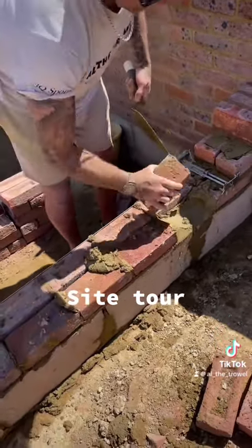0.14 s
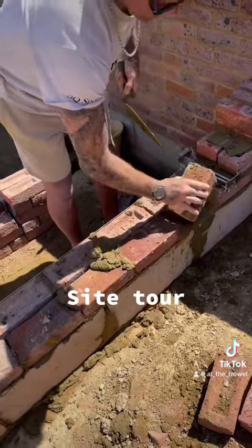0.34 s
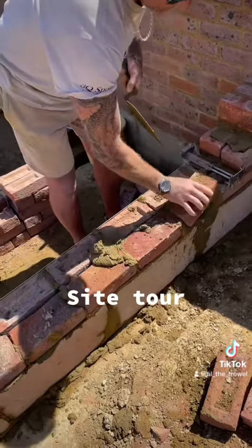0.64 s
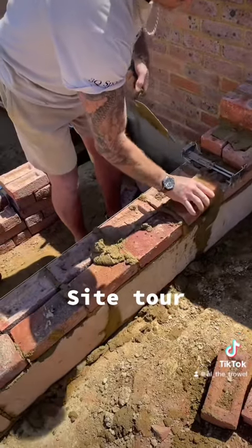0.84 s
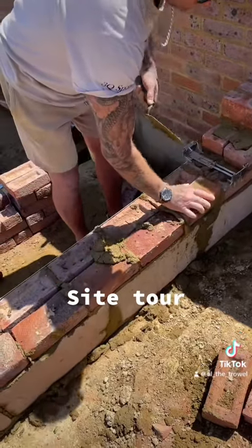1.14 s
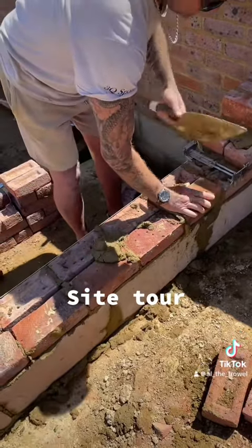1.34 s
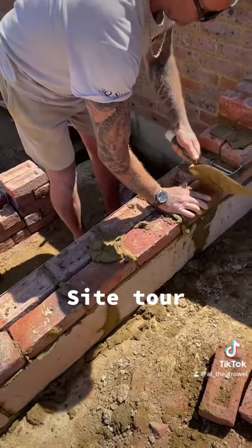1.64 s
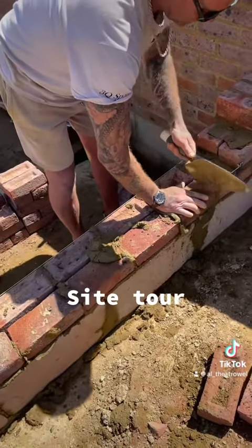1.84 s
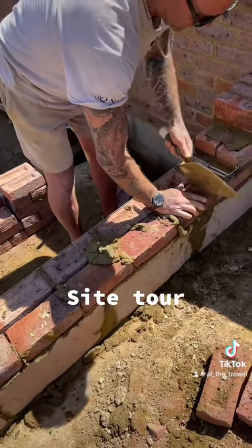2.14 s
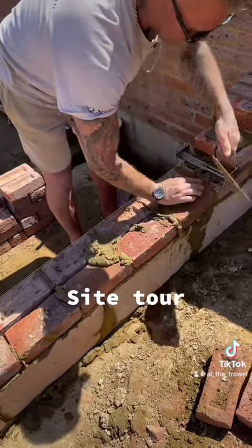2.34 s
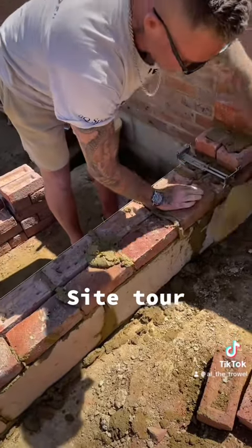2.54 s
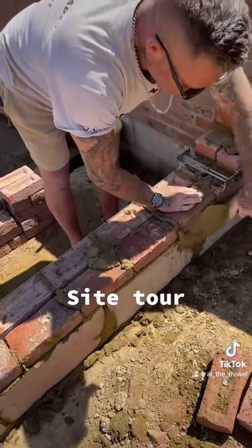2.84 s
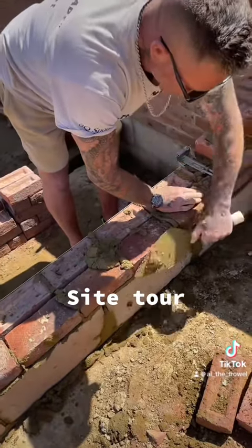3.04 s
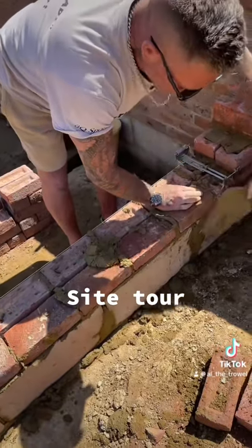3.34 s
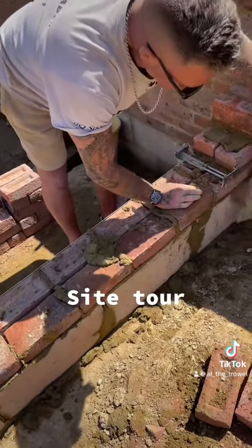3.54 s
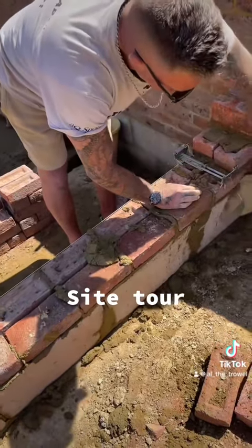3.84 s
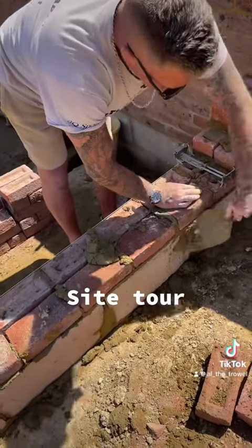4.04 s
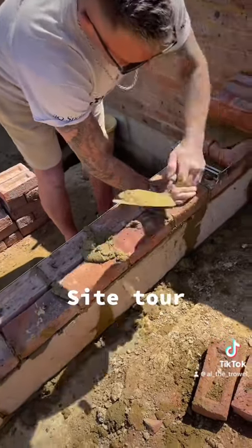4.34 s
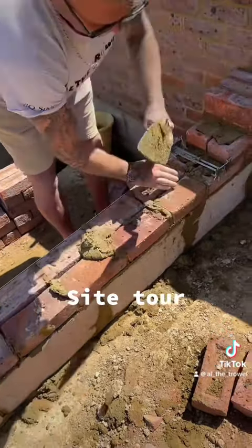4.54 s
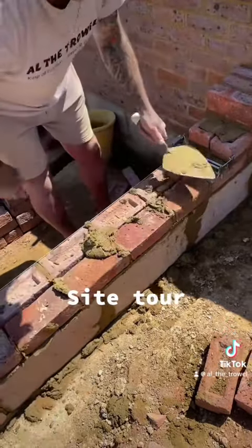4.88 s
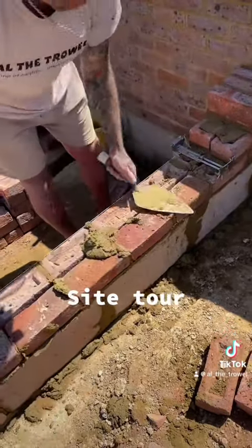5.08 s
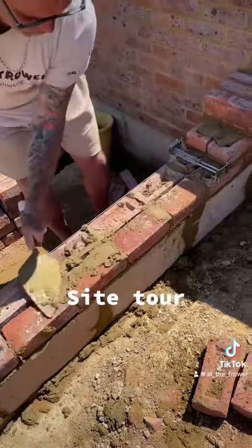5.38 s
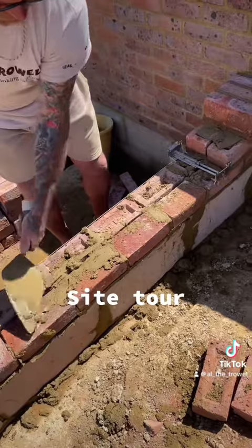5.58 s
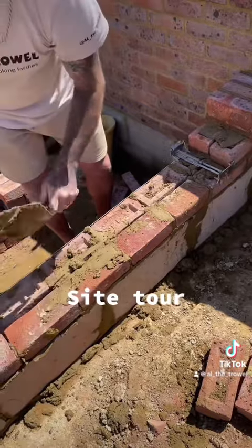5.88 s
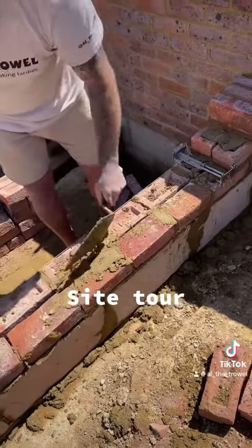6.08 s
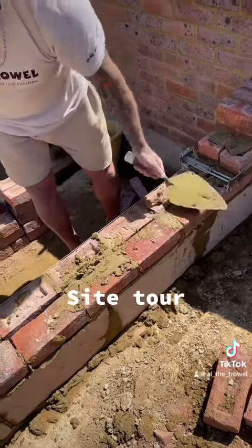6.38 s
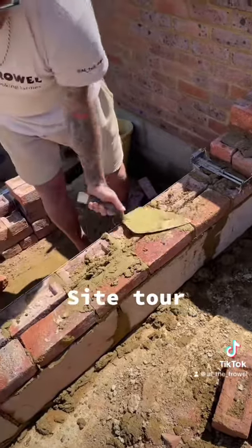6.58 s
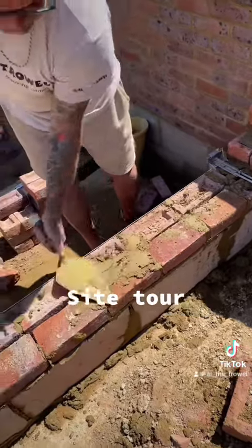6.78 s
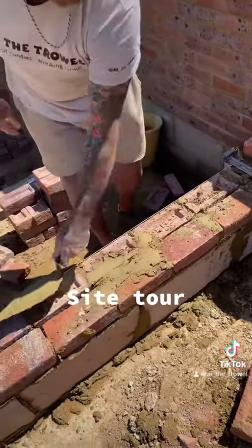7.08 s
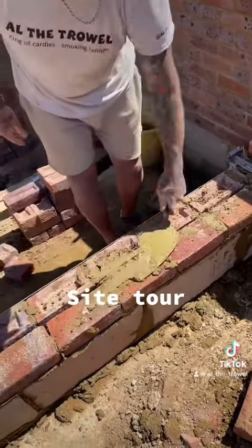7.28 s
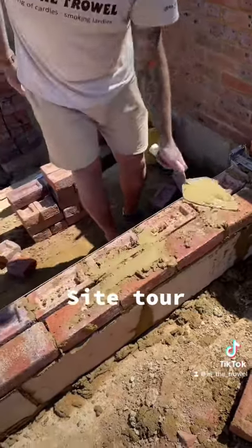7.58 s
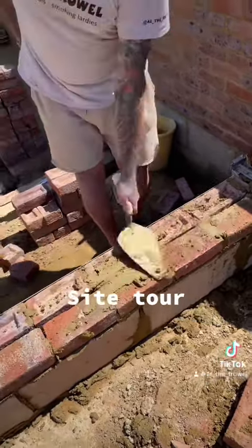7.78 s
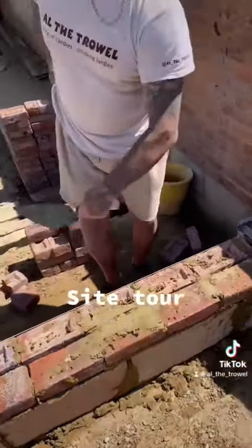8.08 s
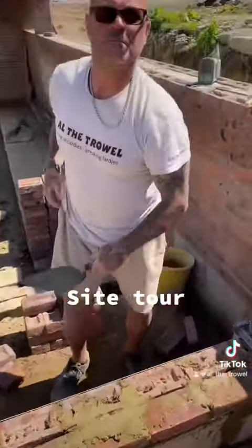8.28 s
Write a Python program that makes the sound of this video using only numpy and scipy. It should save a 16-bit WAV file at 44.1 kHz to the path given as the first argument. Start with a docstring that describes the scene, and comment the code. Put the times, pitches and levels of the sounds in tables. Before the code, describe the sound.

A quiet outdoor yard, close microphone, with very faint traffic, low wind and a wavering distant engine hum, plus small rustles of sleeve and crumbs. Three short, woody-dull brick knocks fall at 1.2, 1.5 and 1.7 s, the second strongest, quickly choked by wet mortar with slight wall reflections. From 2.3 to 3.1 s a steel trowel makes two gritty, lightly ringing scrapes; from 3.4 to 3.75 s it chatters in a dense run of scratchy ticks. A small tick at 4.3 s, then forceful sandy scraping from 4.6 to 5.15 s, with a hard clack at 4.95 and a tiny falling squeak at 5.0. A lull holds a faint rustle at 5.7. From 6.15 to 7.5 s repeated spreading strokes hiss, crunch and clink, sharply at 6.36. Work stops; slight rustles, stronger wind rumble, a soft shoe scuff near 8.3 and a barely audible thin whistle close it.

```python
"""A steel trowel scrapes and spreads gritty mortar along a wall, after three knocks set a brick in its bed.
Crushed sand grains make the hiss and shake resonances of blade and wall; pressure judders, catches add bursts.
Each knock is a sum of dying brick modes with a noise thud and crack; dull echoes and a bright one answer it.
Behind the work: far traffic noise, wind on the microphone, a wavering engine hum, rustles, a scuff, far whistles."""
import sys
import numpy as np
from scipy import signal
from scipy.fft import rfft, irfft, next_fast_len
from scipy.io import wavfile

SR = 44100
rng = np.random.default_rng(int(sys.argv[2]) if len(sys.argv) > 2 else 0)


def transcribe(signal):
    """Save signal, clipped to [-1, 1], as a 16-bit WAV file at the path in sys.argv[1]."""
    frames = np.atleast_2d(signal).T
    limited = np.clip(frames, -1, 1)
    pcm = np.round(limited * 32767).astype(np.int16)
    wavfile.write(sys.argv[1], SR, pcm)


N = 371311
TIME = np.arange(N) / SR

# blows on the brick: start_s, nominal_peak_db, low_modes_db, middle_modes_db, high_modes_db, crack_db
KNOCKS = [(1.2317, -18, 0, -8.5, 0.5, -16), (1.5119, -11.5, -7, -2, 0, -17),
          (1.7017, -20.5, 0.5, -0.5, -10, -14.5)]
# low resonances of the trowel blade, damped by mortar: pitch_hz, width_hz, relative_level_db
BLADE_LOW = [(818.1, 23, 7.5), (876.1, 36, -3.5), (1170, 63, -11.5), (1246.7, 78, 1), (1311.5, 32, -1),
             (1673, 100, 1), (1677, 67, -5)]


def amp(db):
    """dB to gain."""
    return 10 ** (np.asarray(db) / 20)


def rms_one(x):
    """Scale to rms 1."""
    return x / np.sqrt(np.mean(x ** 2) + 1e-20)


def in_time(table, level=0):
    """Columns over time; the level column is silent outside the table's span."""
    before, after = np.array(table[0], float), np.array(table[-1], float)
    before[0] -= 0.01
    after[0] += 0.025
    before[level + 1] = after[level + 1] = -120
    s, *columns = np.transpose([before, *table, after])
    return [np.interp(TIME, s, column) for column in columns]


def swell(s, db, rise, fall):
    """Gain that climbs 20 dB in rise seconds to its top at s and drops 20 dB in fall seconds."""
    # two negative times swap roles: the climb then takes |fall|, the drop |rise|
    return amp(db - 20 * np.maximum((s - TIME) / rise, (TIME - s) / fall))


def drift(rate):
    """Slow chance of rms 1: noise through a two-pole low-pass at rate Hz."""
    r = np.exp(-2 * np.pi * rate / SR)
    slow = signal.lfilter([1], [1, -2 * r, r * r], rng.standard_normal(N + SR))
    return rms_one(slow[SR:])


def coloured(x, spectrum):
    """Shape by a (Hz, dB) spectrum; rms 1."""
    size = next_fast_len(N)
    hz, db = np.transpose(spectrum)
    bin_hz = np.arange(size // 2 + 1) * SR / size
    gain = amp(np.interp(np.log(bin_hz + 1), np.log(hz), db, left=-90, right=-90))
    return rms_one(irfft(rfft(x, size) * gain, size)[:N])


def band(x, low_hz, high_hz):
    """Butterworth band-pass."""
    return signal.sosfilt(signal.butter(2, [low_hz, high_hz], "band", fs=SR, output="sos"), x)


def tone(hz):
    """A sine of rms 1 that follows a pitch curve."""
    return np.sqrt(2) * np.sin(2 * np.pi * np.cumsum(hz) / SR)


def resonate(x, modes):
    """Parallel resonances of alternating sign; x is one input or one for each mode."""
    out, x = 0, np.broadcast_to(x, (len(modes), N))
    for k, (hz, width_hz, db) in enumerate(modes):
        r = np.exp(-np.pi * width_hz / SR)
        poles = [1, -2 * r * np.cos(2 * np.pi * hz / SR), r * r]
        ringing = signal.lfilter([(1 - r * r) / 2, 0, (r * r - 1) / 2], poles, x[k])
        out = out + (-1) ** k * amp(db) * ringing
    return out


def sand(per_s, spread_db, bed_db):
    """Grains of uneven size crushed at random moments, over a bed of finer ones; rms 1."""
    sizes = amp(spread_db * np.minimum(rng.exponential(1, N), 5)) * rng.choice([-1, 1], N)
    grains = rms_one(sizes * (rng.random(N) < per_s / SR))
    return rms_one(grains + amp(bed_db) * rng.standard_normal(N))


def traffic_and_wind():
    """Far traffic is shaped noise, wind on the microphone a low rumble; both waver in level."""
    # yard air, before the wavering: start_s, traffic_db, wind_db
    air_levels = [(0, -82.5, -74.5), (2.2, -82, -75.5), (3.6, -85.5, -69.5), (5.4, -84, -73),
                  (6.7, -86, -75), (7.7, -82, -66), (8.42, -83.5, -62)]
    # colour of the far traffic: pitch_hz, level_db (per Hz)
    air_spectrum = [(8.8, -24), (15, 2), (95, -7), (139, -4.5), (186, -16.5), (281, -20), (638, -29),
                    (1020, -22.5), (1180, -26.5), (1540, -25.5), (3020, -36.5), (6850, -41), (8920, -39),
                    (13100, -48), (16500, -55)]
    traffic_db, wind_db = in_time(air_levels)
    air = coloured(rng.standard_normal(N), air_spectrum)
    traffic = band(air, 110, 16016) / np.std(band(air, 210, 2500))
    wind = rms_one(band(rng.standard_normal(N), 7.4, 45))
    return amp(traffic_db + 0.8 * drift(24)) * traffic + amp(wind_db + 1.3 * drift(10)) * wind


def far_engine():
    """A hum follows a pitch and level curve, under a fainter unsteady octave; both levels waver."""
    # far engine, before the wavering: start_s, pitch_hz, level_db
    hum_curve = [(0.0, 84.84, -54), (0.35, 88.0, -69.5), (1.48, 95.36, -74), (1.83, 95.4, -71.5),
                 (1.97, 91.4, -82.5), (2.16, 97.16, -71.5), (2.44, 92.04, -66), (2.67, 95.54, -75),
                 (4.27, 94.77, -78.5), (5.42, 93.33, -72), (6.0, 97.56, -66.5), (7.24, 103.7, -75.5),
                 (7.48, 98.83, -73), (7.62, 106.1, -73), (7.92, 99.9, -77.5), (8.02, 105.8, -74),
                 (8.33, 101.3, -78), (8.42, 105.4, -74.5)]
    hz, hum_db = in_time(hum_curve, level=1)
    hum = amp(hum_db + 5.5 * drift(6)) * tone(hz)
    octave = amp(-84 + 4 * drift(3)) * tone(2 * hz + 8 * drift(12))
    return hum + octave


def rustles_and_bright_echo():
    """Swells of coloured grains: sleeve and crumbs rustle, a bright echo returns 60 ms after every blow."""
    # sleeve and crumbs: loudest_s, level_db, fade_s (20 dB on either side, sign without effect)
    rustle_swells = [(.108, -81.5, -0.3058), (.5, -93, -0.11), (.6, -87.5, -0.53), (.74, -85, -0.02),
                     (1.09, -99.5, 0.26), (1.649, -85, 0.3365), (1.87, -79, 0.06), (2.11, -80.5, -0.19),
                     (2.26, -75.5, -0.1041), (3.368, -75.5, -0.0519), (3.8, -75.5, 0.03),
                     (3.988, -83.5, 0.2031), (4.116, -87, 0.25), (4.217, -85.5, 0.19), (4.39, -73, 0.05),
                     (4.5, -82, -0.05), (5.29, -82, 0.01), (5.506, -84, 0.1936), (5.69, -64.5, 0.0288),
                     (5.835, -86, 0.03), (6.103, -83, -0.02), (7.8, -82.5, 0.3), (7.944, -84.5, 0.205),
                     (8.252, -80.5, 0.1)]
    # colour of rustle and bright echo: pitch_hz, level_db (per Hz)
    grain_spectrum = [(880, -29), (1500, -13), (2100, -6), (3590, -10.5), (9010, -8.5), (11000, -15.5),
                      (13900, -14), (16000, -19.5)]
    bright_echo = [(s + 0.06, -73, 0.054) for s, *_ in KNOCKS]   # the treble of the echo
    level = sum(swell(s, db, fade, fade) for s, db, fade in rustle_swells + bright_echo)
    return level * coloured(sand(per_s=3000, spread_db=3.0, bed_db=-5), grain_spectrum)


def shoe_scuff():
    """A shoe on sand: swells of band-passed noise."""
    # shoe on sand: loudest_s, level_db, rise_s, fall_s
    scuff_swells = [(8.252, -72.5, 0.21, 0.063), (8.304, -73.5, 0.0134, 0.0155)]
    return sum(swell(*row) for row in scuff_swells) * rms_one(band(rng.standard_normal(N), 400, 1887))


def far_whistles():
    """Thin far whistles: steady sines that swell and fade."""
    # whistles: loudest_s, level_db, rise_s, fall_s, pitch_hz
    whistle_swells = [(5.775, -87.5, .02, 0.034, 3480), (8.35, -83.5, 0.0673, 0.0765, 5083)]
    return sum(swell(*shape) * tone(np.full(N, hz)) for *shape, hz in whistle_swells)


def background():
    """The quiet yard around the work, with the bright echo of the blows."""
    return traffic_and_wind() + far_engine() + rustles_and_bright_echo() + shoe_scuff() + far_whistles()


def yard(x):
    """A few dull echoes, smeared by rough walls, and a thin diffuse tail."""
    # walls near and far: delay_s, level_db, smear_t60_s
    wall_echoes = [(.011, -17, .05), (.04, -33, 0.14), (.066, -30, .07), (.11, -40.5, .2)]
    # what the walls give back: pitch_hz, width_hz, level_db
    wall_colour = [(500, 430, -1.5), (1660, 660, -3), (2105, 500, -0.5)]
    tail_t60_s, tail_db = 0.7, -29
    age = TIME[:SR]
    tail = amp(-60 * age / tail_t60_s) * np.minimum(age / 0.026, 1)
    answer = amp(tail_db) * tail / np.linalg.norm(tail)
    for s, db, t60 in wall_echoes:
        smear = (age > s) * amp(-60 * np.abs(age - s) / t60)
        answer = answer + amp(db) * smear / np.linalg.norm(smear)
    dull = band(resonate(x, wall_colour), 200, 2700)
    return signal.fftconvolve(dull, answer * rng.standard_normal(SR))[:N]


def knocks():
    """A soft contact rings the brick modes, wet mortar soon chokes them; a dull thud and a short crack join."""
    # brick in its mortar bed: pitch_hz, relative_level_db, t60_s
    brick_modes = [(257, -20.5, 0.098), (446, -14.5, 0.081), (810, -17.5, 0.044), (930, -8.5, 0.026),
                   (1137, -3.5, 0.029), (1250, 1, 0.027), (1550, -8, .025), (2075, -4.5, 0.039),
                   (2272, -2.5, 0.021), (2618, -3.5, 0.017), (4367, -19.5, 0.029), (4770, -23, .04),
                   (5200, -24.5, .02), (8020, -28, 0.026)]
    out, age = np.zeros(N), TIME[:SR // 5]
    hz, db, t60 = np.array(brick_modes).T[:, :, None]
    group = np.digitize(hz, [1170, 2400])   # low, middle and high modes
    choked = np.minimum(age / 0.00073, 1) * (0.41 + 0.58 * np.exp(-(age / 0.0058) ** 2))
    for s, peak_db, *group_db, crack_db in KNOCKS:
        level_db = db + np.array(group_db)[group]
        ring = np.sum(amp(level_db - 60 * age / t60) * np.sin(2 * np.pi * hz * age), axis=0)
        crack = band(rng.standard_normal(len(age)), 2300, 11000) * amp(crack_db - 60 * age / 0.035)
        thud = band(rng.standard_normal(len(age)), 700, 2300) * amp(-5.5 - 60 * age / 0.038)
        at = round(s * SR)
        out[at:at + len(age)] += amp(peak_db - 2) * (ring * choked + crack + thud)
    return out


def squeak():
    """The blade tip slips off: a short rough tone that falls in pitch from its loudest moment."""
    # slip: loudest_s, level_db (before the roughness), rise_s, fall_s (negative: swapped), pitch_hz, glide_hz_per_s
    slip = (5, -59.5, -0.0186, -0.0509, 2239.5, -7000)
    *shape, hz, glide = slip
    pitch = hz + glide * np.clip(TIME - shape[0], 0, 0.06)
    return swell(*shape) * amp(4.772 * drift(60)) * tone(pitch + 130 * drift(180))


def favoured(hz, fall_db=36):
    """Where the blade touches decides which low modes ring: fall_db less an octave from hz."""
    return amp(-fall_db * np.abs(np.log2(np.array(BLADE_LOW)[:, :1] / hz)))


def wandering(modes, rate, spread_db):
    """The contact moves along the blade: every mode swells and fades on its own."""
    return amp(spread_db * np.array([drift(rate) for mode in modes]))


def blade_contact():
    """Drive of hiss, bright hiss, blade ring and wall thrum, and the mortar load: juddering strokes, catches."""
    # one list a stroke, before the judder: start_s, hiss_db, ring_over_hiss_db, bright_over_hiss_db
    pressure = [
        [(2.29, -76.5, -3, 5), (2.344, -64.5, -11.5, -1), (2.368, -55.5, -8, 1.5), (2.396, -54, 4.5, -1.5),
         (2.544, -43, 0, 0), (2.55, -38.5, -1, 0), (2.664, -49, 7, -1), (2.692, -59.5, 1, -10),
         (2.725, -86, 8, -1.5)],
        [(2.725, -69.5, 0.5, -16.5), (2.763, -47, 5, -11), (2.773, -49.5, 3.5, -4), (2.899, -36.5, -2.5, -2),
         (2.943, -42.5, 7, 3.5), (3.043, -48, 2, 0.5), (3.059, -79.5, 10, 11), (3.083, -72, -2.5, -4.5),
         (3.2, -87.5, -2, -4)],
        [(4.63, -85, -2.5, -4.5), (4.64, -45.5, -8, 0), (4.69, -38.5, -4, 10.5), (4.728, -43, -9.5, 4.5),
         (4.758, -36, -5, 2.5), (4.784, -50.5, -2.5, 2), (4.806, -36.5, -2.5, -1), (4.874, -35.5, 0, 3),
         (4.92, -64.5, 0, -1.5)],
        [(4.92, -63, -5, -2), (4.954, -36.5, -4.5, 2), (5.01, -53, -0.5, -2), (5.04, -45.5, -4, 1),
         (5.154, -73, -7.5, -6), (5.168, -62, -13.5, -19), (5.216, -68.5, -1.5, -7.5), (5.24, -89, -2, -4),
         (5.3, -90.5, 1, -1.5)],
        [(6.18, -68, -10, -3.5), (6.206, -49.5, 4, -10.5), (6.22, -45, -10, -1), (6.24, -43.5, 0.5, 5.5),
         (6.28, -34.5, -0.5, 3), (6.29, -40, -8.5, 3), (6.294, -37, -14.5, 0.5), (6.32, -30.5, 2, -4.5),
         (6.345, -67.5, 0, 1.5)],
        [(6.345, -59, 0, 2), (6.355, -49, -5.5, -9), (6.367, -38, -10, -2.5), (6.381, -46, -4.5, -5),
         (6.423, -44, -12, -2), (6.447, -55.5, -6, 0.5), (6.487, -45, -1, -8), (6.505, -53, -11, 0.5),
         (6.52, -58, -1.5, 0)],
        [(6.52, -55.5, 4, -2), (6.53, -58, 22, -5), (6.534, -55.5, 2.5, -14), (6.54, -38.5, 0, -5.5),
         (6.576, -42.5, 5, -3.5), (6.588, -51.5, -3.5, -2.5), (6.598, -60.5, -11, -1.5), (6.692, -76.5, -1, -4),
         (6.76, -78, -2.5, -7)],
        [(6.79, -54, 7.5, 8), (6.814, -34.5, 3.5, -2.5), (6.836, -33.5, -2, -6.5), (6.854, -40.5, -0.5, -2),
         (6.898, -44.5, -2.5, 0.5), (6.904, -38, 2, -8), (6.928, -52, -14, -1), (6.95, -45.5, -7.5, -5),
         (6.955, -54, -6.5, -3.5)],
        [(6.955, -58.5, -6.5, -0.5), (6.985, -45.5, 6.5, -8.5), (6.999, -34, -9, -5), (7.071, -36.5, 2, -3.5),
         (7.087, -38, 2.5, -10), (7.095, -45, 0.5, -4), (7.215, -63.5, 1.5, -5.5), (7.29, -59, -2, -9.5)],
        [(7.29, -68, -10.5, -6), (7.304, -60, 5, 2.5), (7.328, -43.5, -8, -2), (7.348, -47.5, -6, 1.5),
         (7.414, -33.5, -8, 2.5), (7.442, -57, 3, -4), (7.462, -65.5, -8.5, -1.5), (7.652, -79, -2, -18),
         (7.7, -84.5, -4, 0)],
    ]
    # how the blade lies in each stroke: thrum_over_hiss_db, mortar_load_db (crunch against ring),
    # favoured_start_hz, favoured_end_hz
    stroke_lie = [(-11.5, 0, 1300, 1230), (-7.5, 2.5, 1330, 1110), (-21.5, 4, 1130, 1450),
                  (-16.5, 9.5, 1100, 1400), (-22, -1.5, 1000, 1280), (-20, 1.5, 1280, 1400),
                  (-23.5, -2.5, 1230, 1210), (-16.5, 3, 861, 1350), (-22, 3.5, 1362, 996),
                  (-24.5, 0, 1253, 1292)]
    # blade catches on an edge or a stone: start_s, nominal_peak_db, favoured_hz, ring_over_hiss_db,
    # thrum_over_hiss_db, t60_s (held within 0.015 to 0.3)
    catches = [(2.361, -37.5, 814.5, 2, -18.5, 0.097), (2.4789, -39, 1310, 7, -9, 0.041),
               (2.682, -40.5, 1087, 0, -15.5, 0.049), (2.7333, -47, 1230, 10, -8, 0.0736),
               (2.76, -27.5, 1414, 4, -25, 0.0255), (2.9999, -28, 828, 4, -9, 0.0604),
               (3.088, -48.5, 1679, 4, -8, 0.032), (3.4008, -31, 821.6, 9.5, 3.5, 0.0349),
               (3.4149, -33, 1200, -8.5, -4.5, 0.0353), (3.4397, -28, 1243, 0.5, -8, 0.051),
               (3.4544, -34, 1301, 2, -4.5, 0.097), (3.4692, -34, 1284, -1.5, -7.5, 0.096),
               (3.4935, -31, 1277, 5.5, -2, 0.088), (3.505, -33.5, 1235, 7, -9.5, 0.083),
               (3.5328, -27, 1370, 5, -7.5, 0.0647), (3.5677, -25.5, 1040, 9.5, -8, 0.06),
               (3.6153, -26.5, 1437, 4.5, -8, 0.0506), (3.653, -26, 823, -0.5, -3, 0.1165),
               (3.687, -29.5, 820, 3.5, -4.5, 0.079), (3.7023, -27, 1310, -0.5, -10, 0.0633),
               (3.737, -26, 1200, 0.5, -9.5, 0.0453), (4.2142, -57.5, 1381, 0.5, -10, 0.0592),
               (4.33, -29.5, 787.6, -2, -3, 0.038), (4.6415, -21.5, 1028, -6, -15.5, 0.0427),
               (4.7945, -22.5, 1387, 3, -12, 0.0453), (4.806, -22, 1000, 2, -10, .04),
               (4.868, -25, 1170, 6, -14, 0.0535), (4.9314, -29, 991.7, 6.5, -3.5, 0.0317),
               (4.9554, -13, 956, -3, -12, 0.027), (5.031, -37, 1460, -1, -11.5, 0.062),
               (5.1674, -49, 1128, -9, -15.5, .06), (5.2091, -50.5, 1211, 4, -9.5, 0.043),
               (5.676, -43, 1484, -2.5, -12.5, 0.0732), (6.1474, -27, 1388, -4, -20, 0.045),
               (6.2018, -31.5, 1216, 4.5, -19, 0.06), (6.3644, -15.5, 1198, -3.5, -21.5, 0.0198),
               (6.3926, -27.5, 1487, -1, -17, 0.031), (6.4178, -24, 1500, -7.5, -13, 0.014),
               (6.4356, -33, 1300, 1.5, -6, 0.0475), (6.4758, -33.5, 1306, 5, -21, 0.06),
               (6.539, -22.5, 1217, 3, -15, 0.0643), (6.7801, -20, 1188, -3.5, -9, 0.0306),
               (6.9676, -31.5, 1430, 6.5, -8.5, 0.077), (7.3221, -34, 1260, -1.5, -13.5, 0.0666),
               (7.3845, -23, 1113, -1, -16, 0.0223), (7.717, -52.5, 1190, -16.5, -25, 0.0323)]
    # light drag under the chatter: firmest_s, hiss_db (before the judder), rise_s, fall_s
    light_drag = (3.5, -65.5, 0.34, 0.1725)
    drag_from_s = 3.4
    catch_rise_s, catch_hold_s = 0.0014, 0.0025
    crest_db, snap = 15, 0.63   # nominal peak over burst level; extra gain at the bite

    ends = [row[0] for stroke in pressure for row in (stroke[0], stroke[-1])]
    lie = np.array(stroke_lie, float)
    thrum_db, load_db = [np.interp(TIME, ends, np.repeat(column, 2)) for column in lie.T[:2]]
    ring_hz = np.interp(TIME, ends, lie[:, 2:].ravel())
    s, _, *over = np.concatenate(pressure).T
    ring_db, bright_db = [np.interp(TIME, s, column) for column in over]

    drag = swell(*light_drag) * (TIME > drag_from_s)
    judder = amp(1.5 * drift(40) + 2.1 * drift(250))
    hiss = sum((amp(in_time(stroke)[0]) for stroke in pressure), drag) * judder
    bright, thrum = hiss * amp(bright_db), hiss * amp(thrum_db)
    ring = hiss * amp(ring_db) * favoured(ring_hz)   # one row for each low mode
    for s, peak_db, hz, ring_over_db, thrum_over_db, t60 in catches:
        at = round(s * SR)
        age = TIME[:min(SR // 5, N - at)]
        dying = amp(-60 * np.maximum(age - catch_rise_s - catch_hold_s, 0) / np.clip(t60, 0.015, 0.3))
        burst = amp(peak_db - crest_db) * np.clip(age / catch_rise_s, 0, 1) * dying
        burst *= 1 + snap * np.exp(-np.abs(age - catch_rise_s) / 0.00017)   # one stone snaps as the contact bites
        span = slice(at, at + len(age))
        hiss[span] += burst
        bright[span] += amp(0.34 * bright_db[at]) * burst
        ring[:, span] += amp(ring_over_db) * burst * favoured(hz)
        thrum[span] += amp(thrum_over_db) * burst
    return hiss, bright, ring, thrum, amp(load_db)


def trowel():
    """Sand crushed under the blade hisses and shakes blade and wall; mortar load trades ring for crunch."""
    # colour of the crushed grit: pitch_hz, level_db (per Hz)
    grit_spectrum = [(760, -32.5), (1300, -9), (2260, -7.5), (4950, -7), (6590, -10), (7480, -6),
                     (9550, -7.5), (11800, -15), (15200, -13.5), (16400, -25.5)]
    # high resonances of the blade: pitch_hz, width_hz, relative_level_db
    blade_high = [(2070, 450, -12.5), (2578, 22, 0), (3068, 130, -12), (4550, 240, -3.5), (4740, 28, -6),
                  (5387, 35, -6), (6018, 73, -8.5), (7440, 370, -4), (7530, 200, -9.5), (8928, 67, -3.5),
                  (9744, 73, -16.5), (10450, 230, -10)]
    # fresh wall under the blade: pitch_hz, width_hz, relative_level_db
    wall_modes = [(188.2, 78, -9.5), (250.6, 40, -2), (331.4, 190, -3), (475, 390, -4), (618, 190, -7.5)]
    hiss, bright, ring, thrum, load = blade_contact()
    grains = sand(per_s=4500, spread_db=3.0, bed_db=-3.5)
    grit = coloured(grains, grit_spectrum)
    grit = grit / np.std(band(grit, 1800, 6500))
    dull = signal.sosfiltfilt(signal.butter(2, 6500, fs=SR, output="sos"), grit)
    upper = hiss * dull + bright * (grit - dull)
    high_ring = resonate(upper * wandering(blade_high, rate=11, spread_db=8.0), blade_high)
    upper = 0.7188 * upper + amp(-4.0) * high_ring
    low_drive = ring / load * grains * wandering(BLADE_LOW, rate=15, spread_db=4.0)
    blade = amp(17.5) * resonate(low_drive, BLADE_LOW)
    crunch = amp(3) * load * band(ring.max(axis=0) * grains, 590, 1884.5)   # mortar crushed under the steel
    wall = amp(20.5) * resonate(thrum * grains, wall_modes)
    return upper + blade + crunch + wall


def scene():
    """Work at the wall, its echoes, the quiet yard."""
    work = trowel() + squeak() + knocks()
    return (work + yard(work) + background())[None]


def record(dry):
    """The top is cut steeply, 60 dB down from 16.6 kHz."""
    return signal.sosfilt(signal.cheby2(12, 60, 16600, fs=SR, output="sos"), dry)


dry = scene()
out = record(dry)
transcribe(out)
```